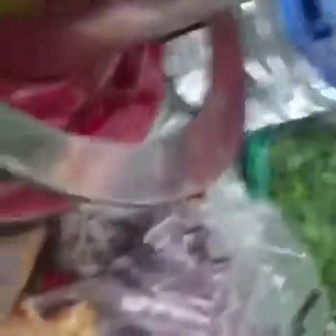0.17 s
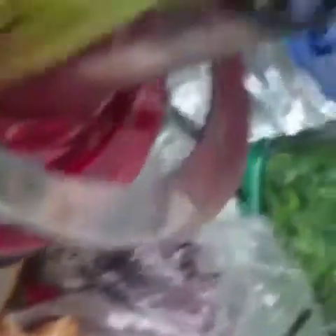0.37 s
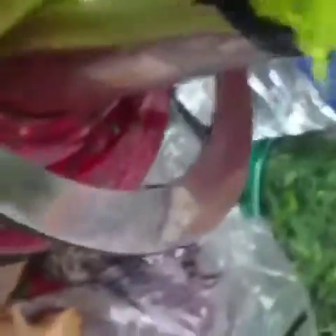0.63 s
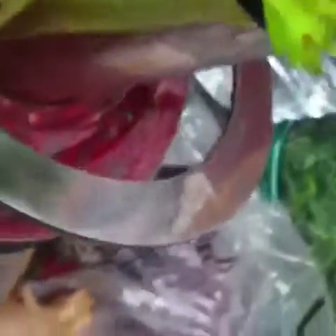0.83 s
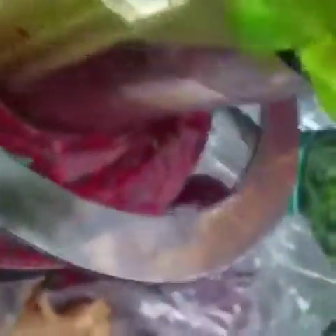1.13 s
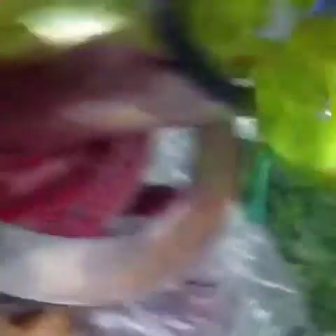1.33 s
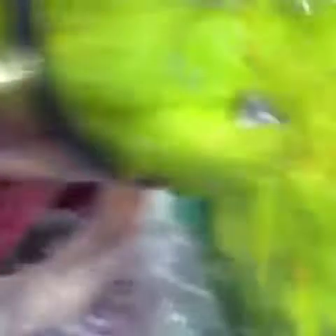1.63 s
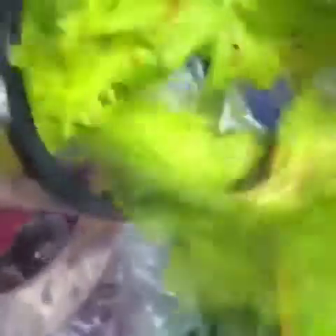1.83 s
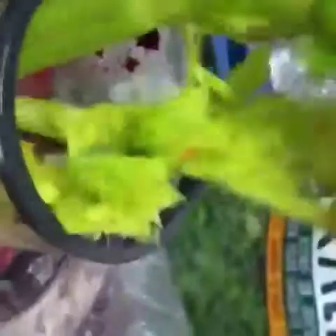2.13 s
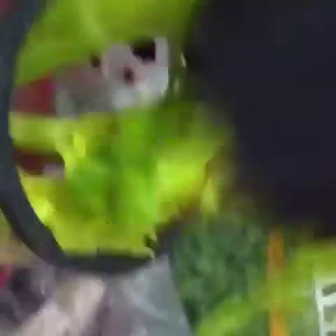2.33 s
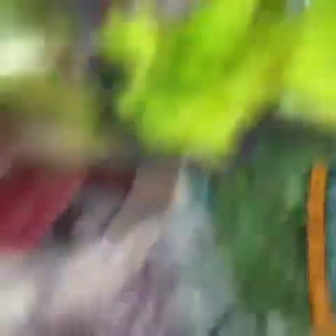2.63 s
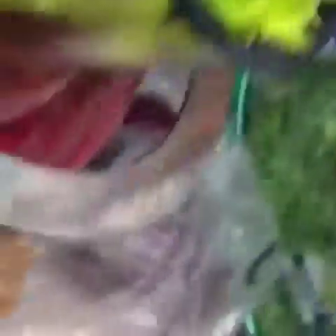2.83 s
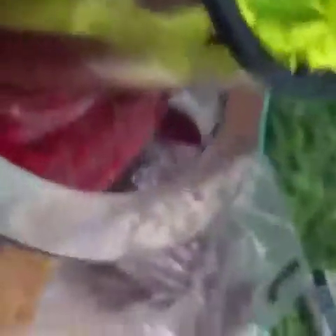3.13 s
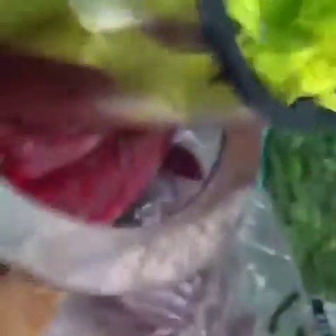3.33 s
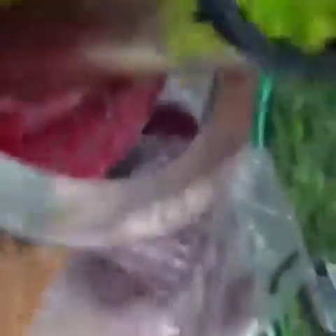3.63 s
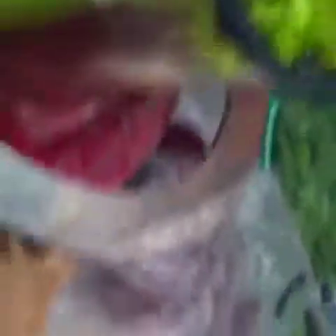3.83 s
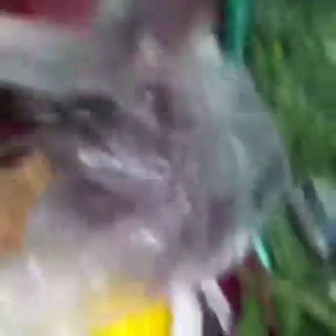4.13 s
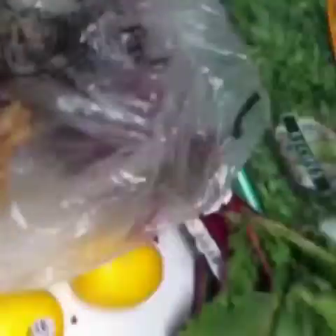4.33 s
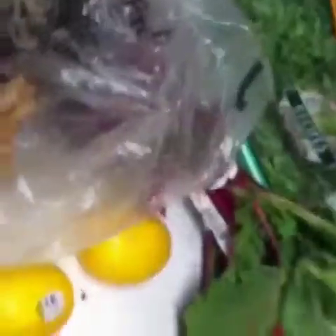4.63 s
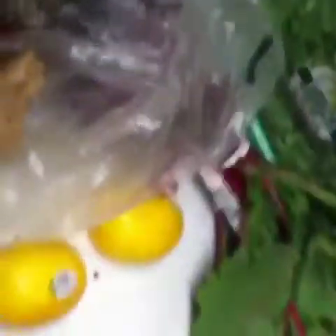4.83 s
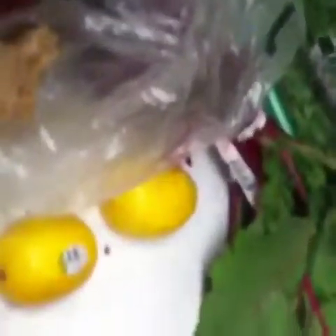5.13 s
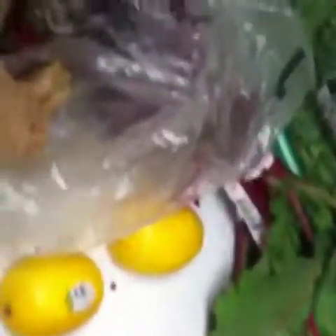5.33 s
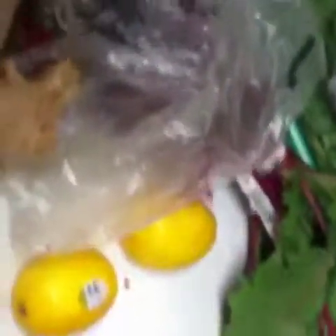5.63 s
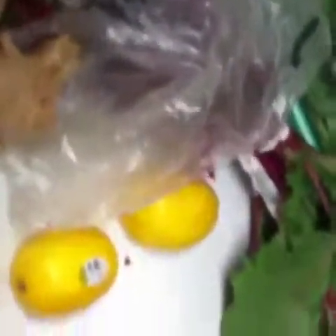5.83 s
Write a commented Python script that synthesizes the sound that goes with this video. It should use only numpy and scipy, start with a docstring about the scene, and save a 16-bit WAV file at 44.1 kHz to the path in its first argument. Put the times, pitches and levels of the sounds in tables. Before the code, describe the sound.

A juicer whirs freely for an instant, then crunches into leafy stalks. Wet pulp rubs and air rushes continuously under irregular bites that drag the motor pitch down briefly. A piercing whine rises around the middle, more crisp crunches follow, then a quieter grinding stretch before the last bites and a double knock on the housing. Close, dry and centred, with no room echo.

```python
"""A centrifugal juicer runs close by while leafy stalks are pushed into it.
The shaft turns about 200 times a second and sags at every bite. Its orders make the housing hum,
the twelve ribs of the disc whine and the basket buzz; filtered noise gives rushing air and rubbing pulp.
Bites shred the stalks in crackling bursts, hard bits tick on the lid as short noise bands, and
knocks on the housing, one past mid-scene and a close pair near the end, ring damped modes."""
import sys
import numpy as np
from scipy import signal
from scipy.fft import rfft, irfft
from scipy.io import wavfile

SR = 44100
rng = np.random.default_rng(int(sys.argv[2]) if len(sys.argv) > 2 else 0)


def dump(signal):
    """Clip the signal to [-1, 1] and save it as 16-bit WAV at the path in sys.argv[1]."""
    limited = np.clip(np.atleast_2d(signal).T, -1, 1)
    pcm = np.round(limited * 32767).astype(np.int16)
    wavfile.write(sys.argv[1], SR, pcm)


N = 264159
TIME_S = np.arange(N) / SR

# shaft speed before the bites brake it: (time [s], speed [turns/s])
UNBRAKED_SPEED = [(0.0, 208.4), (0.24, 209.0), (0.42, 199.9), (.52, 200.4), (0.71, 200.4), (1.07, 204.1),
                  (1.3, 200.6), (1.76, 203.3), (1.9, 202.4), (2.07, 199.4), (2.51, 197.5), (2.97, 202.0),
                  (3.28, 200.3), (3.35, 198.1), (3.5, 198.4), (3.73, 196.8), (3.79, 189.9), (3.94, 189.8),
                  (4.05, 187), (4.15, 187.8), (4.51, 193.5), (5.47, 201.5), (5.62, 203.1), (5.99, 204.5)]
# braking by a bite of gain 1, and time constant of the motor's recovery
BRAKE_TURNS_PER_S2, RECOVER_S = 550, .162

# shaft orders that shake the housing: (order)
HUM_ORDERS = (1, 2, 3, 6, 7)
# hum of the unbalanced basket, first order: (time [s], level [dB])
HUM_LEVEL = [(0, -38), (.22, -38.5), (.4, -43), (1.1, -42.5), (2.5, -42), (2.95, -40.5), (3.15, -47),
             (3.7, -46), (4.85, -39), (5.99, -35.5)]
# drone of the third order under load: (time [s], level [dB])
DRONE_LEVEL = [(0, -54), (.22, -39), (.45, -56), (.95, -39), (1.35, -46.5), (1.9, -32), (2.3, -34),
               (2.95, -43.5), (3.15, -49), (5.99, -49)]
# boom of the housing, seventh order: (time [s], level [dB])
BOOM_LEVEL = [(0, -51), (.22, -42.5), (.4, -48.5), (1, -48), (2.2, -46), (2.95, -39), (3.15, -48.5),
              (3.5, -44), (3.9, -58), (4.5, -53), (5.45, -44), (5.99, -67)]
# second order against the first, sixth against the seventh
SECOND_ORDER_DB, SIXTH_ORDER_DB = 0, -6.5

# whine of the ribs with stalks resting on the disc: (time [s], level [dB])
WHINE_LEVEL = [(0, -29.5), (.22, -32.5), (.38, -47), (.9, -43), (1.7, -37.5), (2.05, -35), (2.22, -28),
               (2.36, -21.5), (2.58, -19.5), (2.7, -24.5), (3.03, -30.5), (3.18, -37.5), (3.5, -33.5),
               (3.95, -39), (4.3, -43), (4.6, -44.5), (4.95, -44), (5.13, -27.3), (5.28, -32), (5.39, -26),
               (5.56, -30.5), (5.68, -30.5), (5.99, -33)]
# cut stalk presses on the ribs and squeals: (time [s], length [s], level [dB])
SQUEALS = [(0.255, 0.044, -19), (0.321, 0.012, -21), (1.108, 0.062, -27.5), (1.21, 0.049, -35),
           (1.611, 0.017, -36), (1.687, 0.035, -30.5), (1.842, 0.035, -29.5), (2.079, 0.042, -27),
           (2.442, 0.037, -19), (3.029, 0.066, -27), (3.314, 0.075, -27.5), (3.514, 0.034, -29),
           (3.544, 0.062, -21), (3.726, 0.023, -44), (3.757, 0.022, -27), (4.068, 0.034, -37),
           (4.62, 0.012, -34), (4.668, 0.017, -31.5), (4.714, 0.021, -28.5), (4.811, 0.051, -30.5),
           (4.922, 0.02, -33), (5.002, 0.048, -34)]
SQUEAL_RISE_S, SQUEAL_FADE_S = 0.026, 0.0088
# stalks shift and lean, single orders swell: (peak time [s], half width to 1/e [s], order, peak level [dB])
SWELLS = [(.1, .15, 2, -39), (.15, .2, 35, -43), (.2, .15, 21, -43), (.48, .08, 22, -44),
          (.67, .11, 23, -36.5), (.85, .25, 16, -45), (.92, .12, 47, -44), (.95, .15, 13, -42),
          (1, .14, 23, -41), (1.13, .1, 17, -40.5), (1.2, .06, 23, -35.5), (1.24, .06, 22, -41),
          (1.55, .06, 23, -42), (1.93, .1, 25, -37), (1.98, .12, 15, -42), (1.98, .18, 28, -39),
          (2.1, .42, 17, -40), (2.35, .55, 4, -51), (2.4, .5, 5, -49), (2.2, .4, 6, -44),
          (2.12, .1, 19, -42), (2.28, .13, 36, -38), (2.3, .15, 37, -43), (2.15, .22, 11, -35),
          (2.25, .17, 10, -33.5), (2.3, .11, 25, -39), (2.45, .4, 27, -42.5), (2.52, .14, 26, -39),
          (2.1, .25, 27, -41), (2.7, .12, 17, -43), (2.92, .12, 26, -39), (2.75, .25, 10, -43),
          (2.84, .18, 42, -44), (2.85, .15, 48, -42), (2.8, .2, 30, -41), (2.85, .15, 31, -44),
          (3.07, .08, 10, -39), (3.3, .05, 10, -36), (3.53, .06, 25, -41), (3.55, .3, 11, -44),
          (3.87, .1, 34, -45), (3.87, .16, 35, -46), (4.07, .06, 11, -39), (4.3, .4, 36, -47),
          (4.43, .12, 18, -44), (4.56, .1, 17, -47), (4.5, .13, 23, -39.5), (4.85, .14, 23, -40),
          (4.7, .25, 35, -44), (5.08, .1, 36, -40.5), (5.25, .15, 48, -44), (5.24, .22, 23, -35.5),
          (5.3, .25, 11, -34), (5.35, .15, 10, -42), (5.37, .17, 13, -38.5), (5.48, .1, 35, -42),
          (5.72, .18, 36, -43), (5.8, .28, 11, -39)]
# octave of the whine as the ribs brush the stalks between slaps: (time [s], level [dB])
BRUSH_LEVEL = [(0, -37), (.35, -44), (.62, -37), (.73, -32), (.8, -39.5), (.9, -35), (1.1, -33),
               (1.29, -45), (1.36, -33), (1.43, -32.5), (1.48, -43), (1.7, -37.5), (1.98, -46), (2.15, -31),
               (2.42, -32), (2.55, -40), (2.9, -35.5), (3.2, -35), (3.65, -42), (3.85, -53), (4.2, -48),
               (4.4, -36.5), (4.7, -40.5), (4.9, -38.5), (5.1, -42), (5.22, -37), (5.31, -32.5),
               (5.42, -39), (5.56, -44), (5.68, -37.5), (5.82, -47), (5.99, -43)]
# ribs slap a loose stalk end: (time [s], length [s], level [dB])
SLAPS = [(1.081, 0.044, -28), (1.171, 0.026, -29), (1.531, 0.0097, -28.5), (1.728, 0.046, -30),
         (2.987, 0.016, -19), (3.28, 0.03, -28.5), (3.512, 0.028, -28), (3.576, 0.013, -35),
         (3.718, 0.01, -26), (4.029, 0.031, -38), (4.269, 0.034, -54)]
SLAP_RISE_S, SLAP_FADE_S = 0.004, 0.022
# lines of brushing and slaps: (order, relative level [dB])
SLAP_LINES = [(22, -14), (23, -13), (24, 0), (25, -16), (35, -14), (36, -15), (47, -17), (48, -14),
              (59, -17)]
# loose stalk makes the ribs strike early or late: (time [s], shaft angle [rad rms])
LOOSENESS = [(0, .01), (.3, .03), (.45, .025), (.58, .006), (1.05, .006), (1.15, .025), (1.28, .025),
             (1.36, .006), (1.44, .006), (1.6, .04), (1.95, .03), (2.15, .006), (3.7, .008), (3.92, .008),
             (4.03, .035), (4.15, .012), (4.35, .005), (4.6, .006), (4.72, .05), (4.98, .05), (5.06, .005),
             (5.99, .005)]

# buzz of the basket: (time [s], level per order [dB])
BUZZ_LEVEL = [(0, -52), (.2, -52), (.36, -58), (1, -54.5), (1.65, -54.5), (1.9, -47.5), (2.4, -48),
              (2.97, -49.3), (3.15, -57), (3.9, -60), (4.5, -56), (4.9, -57), (5.25, -54), (5.7, -61),
              (5.99, -62)]
# colour of the buzz: (frequency [Hz], relative gain [dB])
BUZZ_COLOUR = [(800, 3), (1000, 5), (1650, -3), (2600, 2.5), (3000, 5), (3400, 6.5), (3600, 4), (3800, 5),
               (4400, 6), (5000, 7), (5600, 7.5), (6000, 8), (6500, 5), (7300, 7), (7800, 4), (8700, 10),
               (10300, 4.5), (13000, 5.5), (15800, -10)]

# ring of the empty basket before its fade: (order, level [dB])
IDLE_LINES = [(15, -36), (17, -41), (19, -48), (24, -47)]
# gain of the empty basket's ring and rattle: (time [s], gain [dB])
IDLE_FADE = [(0, 3.5), (.2, 0), (.27, 4), (.4, -70)]
# colour of the empty basket's rattle: (frequency [Hz], relative density [dB/Hz])
IDLE_RATTLE_COLOUR = [(80, -50), (300, -46), (1300, 3.5), (1700, -13), (2100, 6), (2600, -6), (3300, 0),
                      (4200, -12), (9000, -8)]

# rush of air round the basket: (time [s], level [dB])
AIR_LEVEL = [(0, -34), (.22, -29), (.42, -34), (1.4, -33), (2.9, -31.5), (3.15, -37), (3.65, -35),
             (3.85, -41), (4.7, -35), (5.99, -31)]
# colour of the air: (frequency [Hz], relative density [dB/Hz])
AIR_COLOUR = [(20, -8), (45, -12), (75, -26), (110, -13), (140, -12), (180, -6), (255, 3), (320, -.5),
              (400, -3), (520, -3), (650, -2), (900, -8), (1250, -5), (1500, -11), (1850, -7),
              (4000, -10.5), (9000, -14.5), (16000, -18.5)]

# pulp rubbing on the disc: (time [s], level [dB])
RUB_LEVEL = [(0, -39), (.35, -29.5), (.6, -32.5), (1.25, -30), (1.45, -33), (2.05, -27), (2.95, -36.5),
             (3.15, -34.5), (3.62, -34), (3.85, -38), (4.05, -31.5), (4.25, -37), (4.55, -35),
             (4.75, -31.5), (5.35, -29), (5.99, -38)]
# colour of the rubbing pulp: (frequency [Hz], relative density [dB/Hz])
PULP_COLOUR = [(80, -45), (300, 8), (1000, -1), (1700, -4.5), (2050, 20.5), (2400, 9.5), (2800, 7.5),
               (3700, 9.5), (4600, 9.5), (5600, 9.5), (7000, 9), (10000, 6.5), (13000, 6), (16000, 4)]
# bands that flare on their own in rubbing and shredding: (centre [Hz])
FLARE_BANDS = (2100, 3300, 4700, 6200, 7600, 9500, 11500, 14000)
CLING_GAIN = .5  # kept from one turn to the next

# disc bites into a stalk: (time [s], length [s], level [dB], fade time constant [s])
BITES = [(.221, 0.0071, -15.5, 0.04), (.268, 0.035, -18.5, 0.045), (.426, 0.018, -29, 0.022),
         (1.087, 0.012, -19, 0.02), (1.103, 0.0062, -18, 0.044), (1.176, 0.013, -26.5, 0.031),
         (1.293, 0.025, -29.5, 0.02), (1.527, 0.0057, -21.5, 0.028), (1.606, .018, -26.5, 0.022),
         (1.663, 0.013, -19.5, 0.035), (1.707, 0.005, -23.5, 0.027), (1.815, 0.023, -18, 0.025),
         (2.021, 0.0089, -26, 0.018), (2.073, 0.047, -22.5, 0.042), (2.232, 0.024, -23.5, 0.017),
         (2.429, 0.033, -24.5, 0.018), (2.992, 0.037, -19, 0.016), (3.062, 0.049, -27.5, 0.0093),
         (3.284, 0.016, -17.5, 0.018), (3.514, 0.02, -19.5, 0.039), (3.568, 0.016, -21.5, 0.022),
         (3.683, 0.036, -28, 0.04), (3.7295, 0.01207, -15, 0.01007), (3.758, 0.0255, -25, 0.0102),
         (3.928, 0.039, -32.5, 0.024), (3.983, 0.037, -29.5, 0.021), (4.037, 0.017, -25.5, 0.025),
         (4.101, 0.028, -28.5, 0.0091), (4.742, 0.042, -27.5, 0.051), (4.796, 0.027, -23, 0.0412),
         (4.959, 0.0094, -24.5, 0.026), (4.986, 0.015, -20, 0.01), (5.415, 0.02, -22.5, 0.07),
         (5.556, 0.022, -21.5, 0.021), (5.577, 0.0086, -18, 0.012)]
BITE_RISE_S = 0.00898
# colour of shredding: (frequency [Hz], relative density [dB/Hz])
SHRED_COLOUR = [(60, -70), (200, -30), (700, -5.5), (1600, 0), (2100, 6), (2900, 1.5), (4000, 5.5),
                (4700, 11.5), (5700, 6), (7000, 7), (10000, 6.5), (13000, 6), (16000, 7)]
# stiff strings: total rate, ring, level against the tearing
CRACKS_PER_S, CRACK_T60_S, CRACK_DB = 1200, .011, -4.5

# hard bits of fibre hit the lid: (time [s], onset level [dB], centre [Hz])
TICKS = [(.248, -21, 6000), (.299, -22, 5000), (0.352, -13, 6000), (1.106, -17, 5000), (.486, -19.5, 5970),
         (1.670, -21, 6000), (1.684, -20.5, 5500), (1.7075, -15.5, 7970), (1.839, -18, 6983),
         (3.108, -18, 4295), (3.1085, -13, 8500), (3.328, -23, 7030), (3.733, -24, 5030),
         (4.355, -27, 6990), (4.457, -22.5, 10990), (4.829, -16, 5243), (4.991, -14, 5020),
         (5.585, -14, 6990), (5.76, -18, 5990)]
TICK_FADE_S = .002

# knocks on the housing: (time [s], level [dB], brightness [dB/octave])
KNOCKS = [(3.745, -31.5, 7), (5.7593, -25.5, 7.5), (5.775, -27.5, -1)]
# modes of the plastic housing: (frequency [Hz], relative level [dB], t60 [s])
HOUSING_MODES = [(270, -24, 0.03), (384, 11.5, 0.029), (543, 9, 0.017), (840, 7.5, 0.02), (1250, -1, 0.029),
                 (1570, -1.5, 0.024), (1800, 6, 0.009), (3140, 5.5, 0.0011)]

EDGE_HZ = 15830  # upper band limit


def amp(db):
    """Decibels to gain."""
    return 10 ** (np.asarray(db) / 20)


def unit(x):
    """Scales to rms 1."""
    return x / np.sqrt(np.mean(abs(x) ** 2) + 1e-20)


def curve(rows):
    """Interpolates a control table at every sample."""
    return np.interp(TIME_S, *np.transpose(rows))


def colour_at(points, hz):
    """Gain of a spectrum table, interpolated over log frequency."""
    table_hz, db = np.transpose(points)
    return amp(np.interp(np.log(hz + 1), np.log(table_hz + 1), db))


def coloured(x, points):
    """Filters x by a spectrum table, keeping the power of white noise."""
    gain = unit(colour_at(points, np.fft.rfftfreq(N, 1 / SR)))
    return irfft(rfft(x) * gain, N)


def drift(rate_hz):
    """Smooth random signal of rms 1: noise low-passed near rate_hz."""
    count, control_hz = 4096, 600
    hz = np.fft.rfftfreq(count, 1 / control_hz)
    spectrum = rfft(rng.standard_normal(count)) / (1 + (hz / rate_hz) ** 4)
    slow = unit(irfft(spectrum))
    return np.interp(TIME_S * control_hz, np.arange(count), slow)


def line(angle, order, waver_db, slip_rad):
    """One shaft order of rms 1 whose level and phase wander."""
    level = unit(amp(waver_db * drift(11.6)))
    phase = order * angle + slip_rad * drift(7.1) + 2 * np.pi * rng.random()
    return np.sqrt(2) * level * np.cos(phase)


def strokes(rows, rise_s):
    """Envelope of (time, length, dB, fade) rows: rise, hold, exponential fade; overlaps add in power."""
    power = np.zeros(N)
    for start_s, length_s, db, fade_s in rows:
        near = (TIME_S > start_s - .05) & (TIME_S < start_s + .5)
        t = TIME_S[near] - start_s
        rise = np.clip(t / rise_s + .5, 0, 1)  # half up at start_s
        fade = np.exp(-np.maximum(t - length_s, 0) / fade_s)
        power[near] += (amp(db) * rise * fade) ** 2
    return np.sqrt(power)


def crackle(angle, per_s, spread_db, hiss, throb):
    """Snapping fibres of very unequal size over a wet hiss, crowded on one side of each turn."""
    size = amp(spread_db * np.minimum(rng.exponential(1, N), 4))
    struck = rng.random(N) < per_s / SR
    snaps = unit(size * rng.standard_normal(N) * struck)
    turn = np.exp(throb * np.cos(angle + 2.0 * drift(0.35)))
    return unit((snaps + hiss * rng.standard_normal(N)) * turn)


def shaft_speed(bite):
    """Every bite brakes the shaft; the motor wins the speed back exponentially."""
    keep = np.exp(-1 / (RECOVER_S * SR))
    sag = signal.lfilter([BRAKE_TURNS_PER_S2 / SR], [1, -keep], bite)
    return curve(UNBRAKED_SPEED) - sag


def hum(angle):
    """Imbalance shakes the housing at the lowest shaft orders; load adds a drone and a boom."""
    hum_db, boom_db = curve(HUM_LEVEL), curve(BOOM_LEVEL)
    levels_db = hum_db, hum_db + SECOND_ORDER_DB, curve(DRONE_LEVEL), boom_db + SIXTH_ORDER_DB, boom_db
    return sum(amp(db) * line(angle, order, waver_db=.7, slip_rad=.03 * order)
               for db, order in zip(levels_db, HUM_ORDERS))


def whine(angle):
    """Twelve ribs pass the chute each turn; leaning or slapped stalks add further shaft orders."""
    looseness = curve(LOOSENESS)
    # loose stalks chatter fast, firm pressure sings cleanly
    chatter = amp(np.minimum(70 * looseness, 2.5) * drift(55))
    ribs = angle + looseness * drift(50)
    squeals = strokes([(*row, SQUEAL_FADE_S) for row in SQUEALS], SQUEAL_RISE_S)
    tone_level = np.hypot(amp(curve(WHINE_LEVEL)), squeals)
    tone = tone_level * chatter * line(ribs, order=12, waver_db=.7, slip_rad=.05)

    swells = np.zeros(N)
    for peak_s, half_s, order, db in SWELLS:
        envelope = amp(db) * np.exp(-((TIME_S - peak_s) / half_s) ** 2)
        swells += envelope * line(ribs, order, waver_db=1.6, slip_rad=.2)

    slap_tone = sum(amp(db) * line(ribs, order, waver_db=1.2, slip_rad=.15) for order, db in SLAP_LINES)
    slaps = strokes([(*row, SLAP_FADE_S) for row in SLAPS], SLAP_RISE_S)
    slap_level = np.hypot(amp(curve(BRUSH_LEVEL)), slaps)
    return tone + swells + slap_level * slap_tone


def buzz(angle):
    """The basket rattles nearly alike each turn: a dense comb whose high orders blur."""
    orders = np.setdiff1d(np.arange(4, 80), tuple(HUM_ORDERS) + (12,))
    gains = unit(colour_at(BUZZ_COLOUR, orders * curve(UNBRAKED_SPEED).mean()))
    shaken = angle + .004 * drift(90)  # contacts a little early or late
    comb = np.zeros(N)
    for order, gain in zip(orders, gains):
        load = unit(amp(2.5 * drift(1.5)))  # slow shifts of load
        comb += gain * load * line(shaken, order, waver_db=2.2, slip_rad=order / 130)
    return amp(curve(BUZZ_LEVEL)) * comb


def idling(angle):
    """The unloaded basket rings at shaft orders and rattles, fading out as the first bites come."""
    ring = sum(amp(db) * line(angle, order, waver_db=0.0, slip_rad=0.22) for order, db in IDLE_LINES)
    grain = crackle(angle, per_s=1600, spread_db=14, hiss=1.2, throb=0.28)
    rattle = amp(-31.5) * coloured(grain, IDLE_RATTLE_COLOUR)
    return amp(curve(IDLE_FADE)) * (ring + rattle)


def air():
    """The spinning basket and the motor fan churn the air: coloured noise with a flutter."""
    flutter_db = .5 * drift(14)
    return amp(curve(AIR_LEVEL) + flutter_db) * coloured(rng.standard_normal(N), AIR_COLOUR)


def clinging(grain, angle):
    """What clings to the disc scrapes again, more weakly, in the next three turns."""
    turn_before = np.searchsorted(angle, angle - 2 * np.pi)
    again, total = grain, grain
    for _ in range(3):
        again = CLING_GAIN * again[turn_before] * (turn_before > 0)
        total = total + again
    return unit(total)


def ragged(x, patchy_db, rate_hz):
    """Every band of x flares and dips on its own, so the colour keeps changing."""
    hz, spectrum = np.fft.rfftfreq(N, 1 / SR), rfft(x)
    total = np.zeros(N)
    for pick in np.eye(len(FLARE_BANDS)):
        band = irfft(spectrum * np.interp(hz, FLARE_BANDS, pick), N)
        total += band * amp(patchy_db * drift(rate_hz))
    return unit(total)


def rubbing(angle):
    """Pulp slides over the disc and sieve all the time."""
    grain = clinging(crackle(angle, per_s=5000, spread_db=2.0, hiss=1.56, throb=0.11), angle)
    level = amp(curve(RUB_LEVEL) + .5 * drift(25))
    return level * ragged(coloured(grain, PULP_COLOUR), patchy_db=1.3, rate_hz=12)


def cracks(count=40):
    """Stiff strings crack one by one, unequal in size, each ringing briefly at one of count pitches."""
    t = np.arange(0, CRACK_T60_S, 1 / SR)
    out = np.zeros(N)
    for hz in np.linspace(1900, 15000, count):
        size = amp(4 * np.minimum(rng.exponential(1, N), 2.5))
        hits = size * (rng.random(N) < CRACKS_PER_S / count / SR)
        ring = amp(-60 * t / CRACK_T60_S) * np.sin(2 * np.pi * hz * t)
        out += signal.oaconvolve(hits, ring)[:N]
    return unit(coloured(out, SHRED_COLOUR))


def shredding(angle, bite):
    """Fibres crack and tear in clumps under each bite's envelope, chopped by the ribs."""
    grain = clinging(crackle(angle, per_s=6000, spread_db=1.6, hiss=.9, throb=.22), angle)
    tearing = ragged(coloured(grain, SHRED_COLOUR), patchy_db=1.9, rate_hz=90)
    crunch = unit(tearing + amp(CRACK_DB) * cracks())
    clumps = unit(amp(.6 * drift(200)))
    # uneven chopping: a rasp smeared round the whine and its overtones
    rasp = np.zeros(N)
    for order in (12, 24, 36, 48):
        smeared = drift(110) * np.cos(order * angle) + drift(110) * np.sin(order * angle)
        rasp += smeared * (12 / order) ** .6
    return bite * clumps * (crunch + amp(-12.0) * rasp)


def ticks():
    """Flung bits strike the lid: very short noise bursts, each in its own band."""
    out = np.zeros(N)
    for start_s, db, hz in TICKS:
        near = (TIME_S >= start_s) & (TIME_S < start_s + .03)
        band = signal.butter(1, [hz / 1.3, min(hz * 1.3, EDGE_HZ)], "band", fs=SR)
        noise = unit(signal.lfilter(*band, rng.standard_normal(2000)))[:near.sum()]
        out[near] += amp(db) * noise * np.exp(-(TIME_S[near] - start_s) / TICK_FADE_S)
    return out


def knocks():
    """Blows ring the damped modes of the housing, tilted about 800 Hz by each blow's brightness."""
    out = np.zeros(N)
    for start_s, level_db, tilt_db in KNOCKS:
        after = (TIME_S >= start_s) & (TIME_S < start_s + .1)
        t = TIME_S[after] - start_s
        for i, (hz, mode_db, t60_s) in enumerate(HOUSING_MODES):
            ring = amp(level_db + mode_db + tilt_db * np.log2(hz / 800) - 60 * t / t60_s)
            out[after] += (-1) ** i * ring * np.sin(2 * np.pi * hz * t)
    return signal.sosfilt(signal.butter(4, 170, "high", fs=SR, output="sos"), out)


def scene():
    """One shaft, with a slight flutter, drives the machine; both channels are alike."""
    bite = strokes(BITES, BITE_RISE_S)
    flutter = 1 + .0008 * drift(25)
    angle = 2 * np.pi * np.cumsum(shaft_speed(bite) * flutter) / SR
    machine = hum(angle) + whine(angle) + buzz(angle) + idling(angle) + air()
    stalks = rubbing(angle) + shredding(angle, bite)
    mono = machine + stalks + ticks() + knocks()
    return np.array([mono, mono])


def record(dry):
    """Rounds off the tallest peaks below .54 and limits the band at both ends."""
    rounded = dry / (1 + (dry / .54) ** 14) ** (1 / 14)
    low_cut = signal.sosfilt(signal.butter(3, 100, "high", fs=SR, output="sos"), rounded)
    high_cut = signal.firwin(511, EDGE_HZ, window=("kaiser", 9), fs=SR)
    return signal.oaconvolve(low_cut, high_cut[None], "same")


dry = scene()
out = record(dry)
dump(out)
```